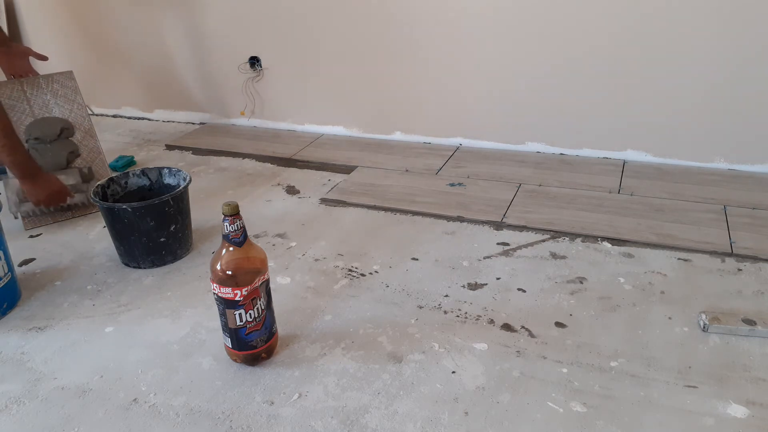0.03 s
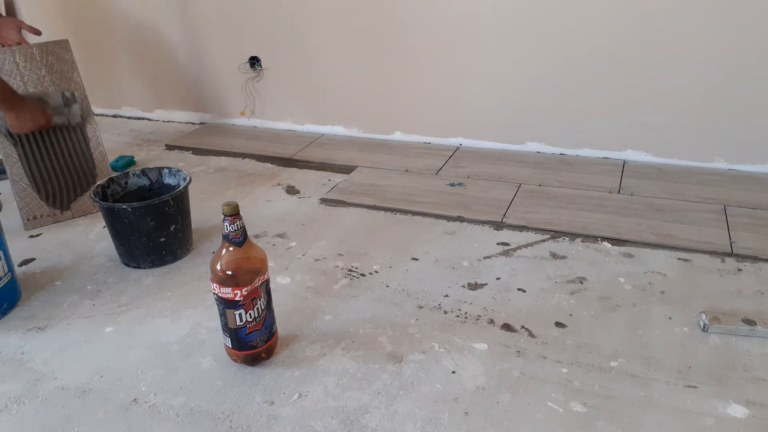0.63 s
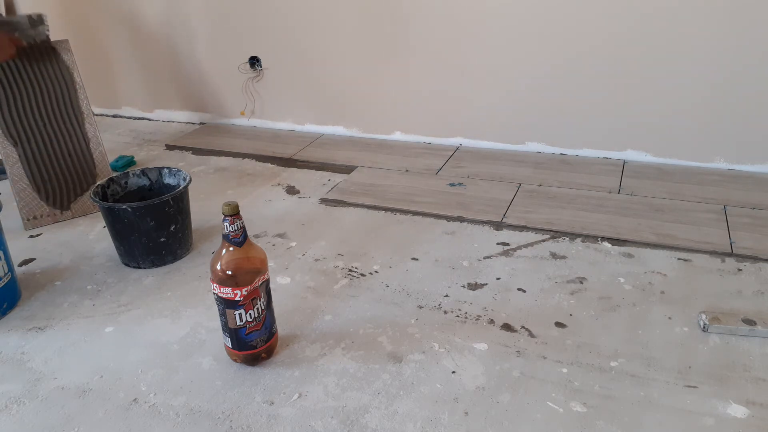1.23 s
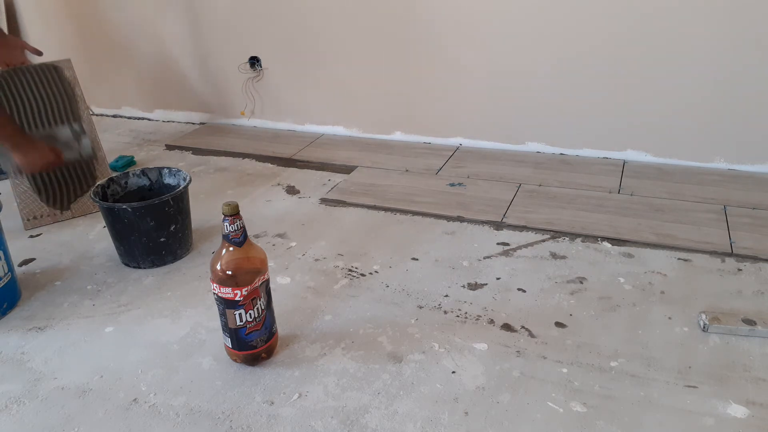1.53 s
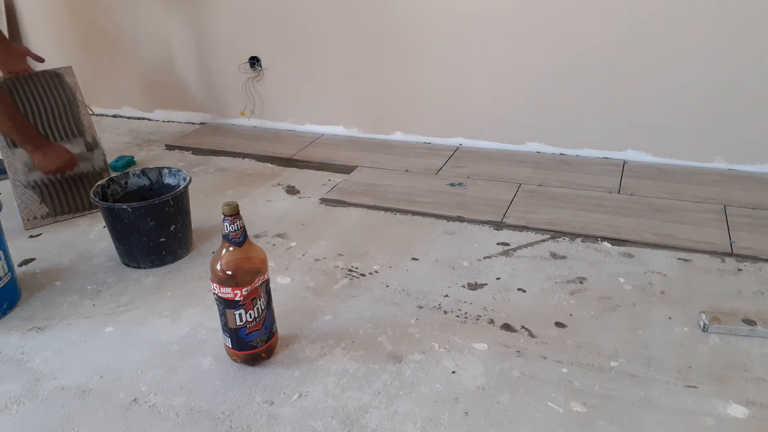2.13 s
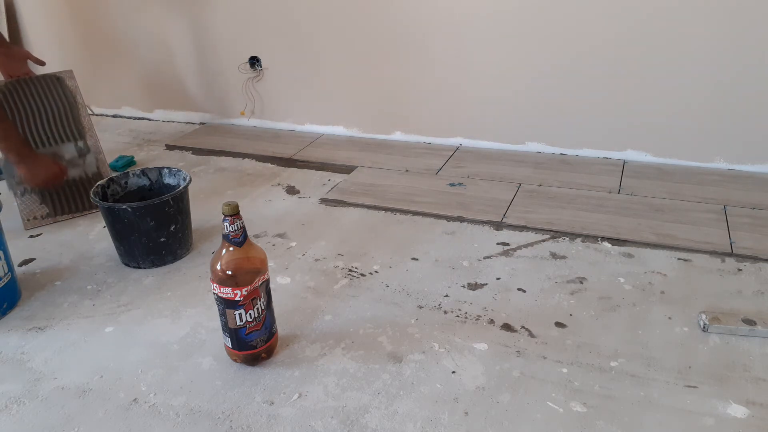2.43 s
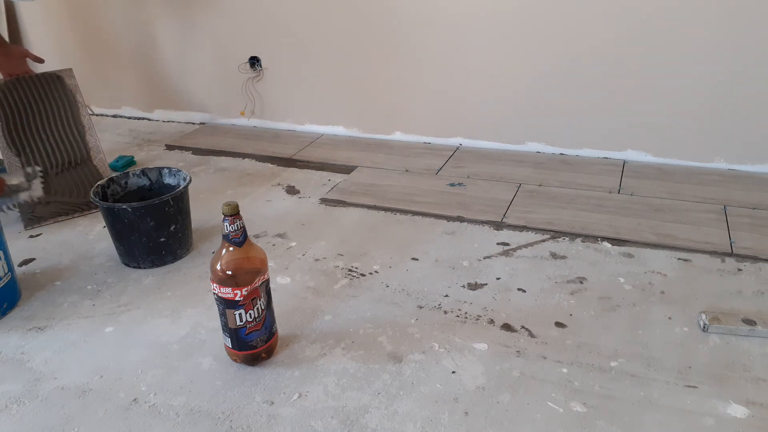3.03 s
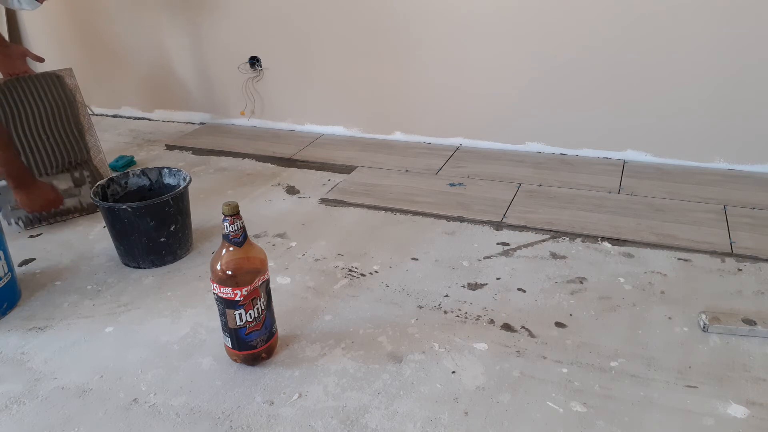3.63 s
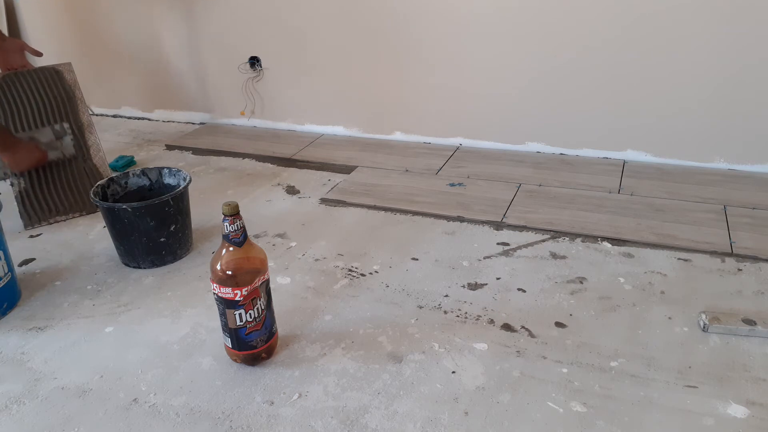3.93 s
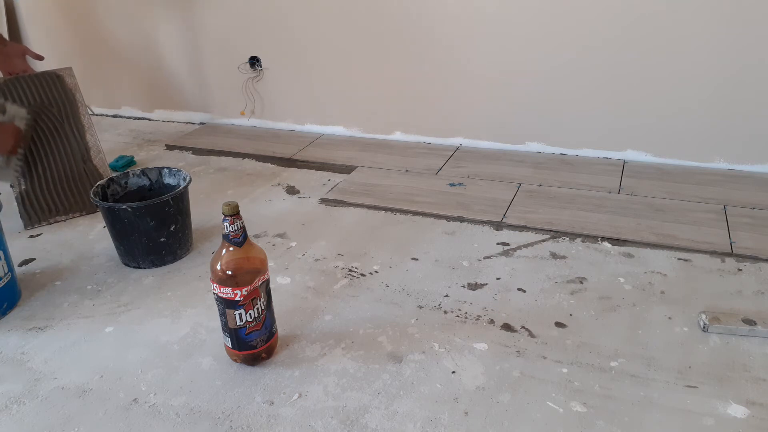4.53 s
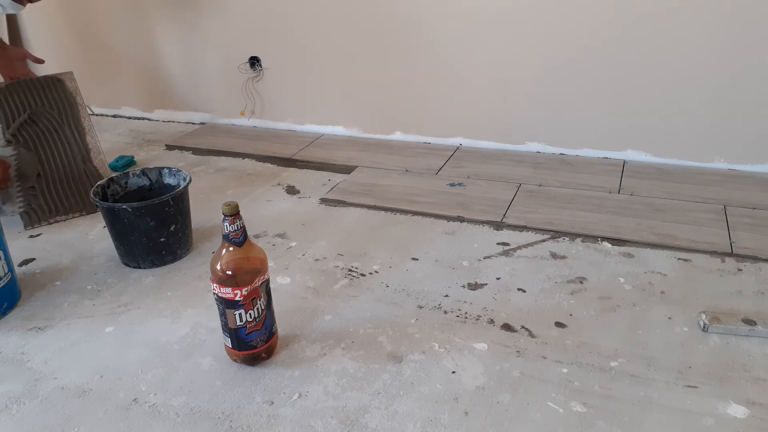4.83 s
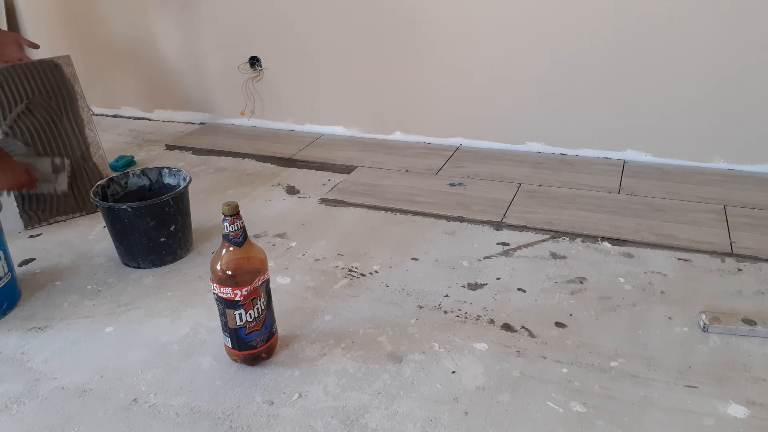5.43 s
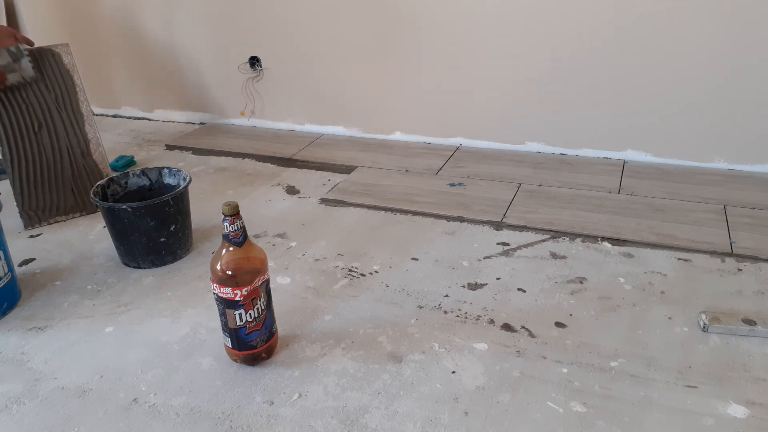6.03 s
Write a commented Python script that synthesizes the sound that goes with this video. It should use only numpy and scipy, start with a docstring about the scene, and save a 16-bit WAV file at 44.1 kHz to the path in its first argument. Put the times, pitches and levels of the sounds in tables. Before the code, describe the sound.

A notched steel trowel scrapes gritty adhesive across a ceramic tile in repeated strokes, with sharp ticks, in an echoing bare room.

```python
"""Over faint room air, a notched steel trowel ticks down on a ceramic tile and combs gritty adhesive.
Short pushes come first: sand snaps under the teeth, the blade judders, the upended tile flexes and drones.
Longer pulls follow at 2.7 s and, hardest, at 3.8 s; after two more, a sharp tick and two hissy dabs end it.
All along, bare plaster and screed ring, so from a few metres off one hears mostly the echo."""
import sys
import numpy as np
from scipy import signal
from scipy.fft import rfft, irfft, next_fast_len
from scipy.io import wavfile
from scipy.ndimage import uniform_filter1d

SR = 44100
rng = np.random.default_rng(int(sys.argv[2]) if len(sys.argv) > 2 else 0)


def pcm_store(signal):
    """Save signal as 16-bit PCM."""
    levels = np.round(np.clip(np.atleast_2d(signal), -1, 1) * 32767)
    wavfile.write(sys.argv[1], SR, levels.astype(np.int16).T)


N = 276495
TIME = np.arange(N) / SR
FFT_SIZE = next_fast_len(N + 2 * SR)
FREQ = np.maximum(np.arange(FFT_SIZE // 2 + 1) * SR / FFT_SIZE, 1)


def undb(db):
    """Decibels to gain."""
    return 10 ** (np.asarray(db) / 20)


def unit_rms(x):
    """Scale to rms 1."""
    return x / np.sqrt(np.mean(x ** 2))


def curve(points):
    """Draw (Hz, value) breakpoints across the spectrum on a log-frequency axis."""
    hz, value = np.transpose(points)
    return np.interp(np.log(FREQ), np.log(hz), value)


def eq(x, response):
    """Filter by a response given for each frequency."""
    return irfft(rfft(x, FFT_SIZE) * response, FFT_SIZE)[..., :x.shape[-1]]


def resonance(hz, width_hz):
    """Response of a damped resonator, 1 at its centre."""
    return 1 / (1 + 1j * (FREQ / hz - hz / FREQ) * hz / width_hz)


def ring(x, hz, width_hz):
    """Play a sound through a damped resonator."""
    return signal.lfilter(*signal.iirpeak(hz, hz / width_hz, fs=SR), x)


def drift(rate_hz):
    """Smooth random modulation with a spread near 1."""
    steps = rng.standard_normal(4096)
    return np.interp(TIME * rate_hz, np.arange(len(steps)), steps)


# tone of the room's air: f/Hz, relative level/dB
AIR_EQ = [(30, -38), (100, 3), (200, -16), (320, 1.5), (600, -11), (1400, -16), (3000, -18), (6500, -12),
          (8300, -25), (15000, -31)]
def room_air(level_db=-70):
    """A faint, steady bed of house air, partly shared by left and right."""
    noise = rng.standard_normal((2, N)) + rng.standard_normal(N)
    return undb(level_db) * unit_rms(eq(noise, undb(curve(AIR_EQ))))


def grit(grains_per_s, spread_db, catch_db, catch_hz):
    """Sand grains snap one by one, many small and a few large; the blade catches and slips."""
    hits = rng.random(N) < grains_per_s / SR
    size = undb(spread_db * np.minimum(rng.exponential(size=N), 5))
    polarity = rng.choice([-1, 1], N)
    grains = hits * size * polarity * undb(catch_db * drift(catch_hz))
    # the hand keeps the mean force steady
    power = uniform_filter1d(grains ** 2, size=2000)
    return grains / np.sqrt(np.maximum(power, 1e-9))


# trowel strokes: landing t/s, skim/s, press/s, slide/s, landing force/dB, full force/dB,
# easing over the slide/dB, flex of the tile/dB, bite of steel on grit/dB
STROKES = [ (.125, 0.057, 0.06, 0.06, -30.5, -16.5, 1, 4, 3),
           (.645, 0.019, 0.033, 0.056, -31.5, -25, 1, 7.5, 2.5),
           (1.112, 0, 0.0071, 0.0083, -31, -26, 0, 7.5, 2.5),
           (1.858, 0.013, 0.063, 0.15, -42.5, -32.5, -2, 6, 0),
           (2.699, 0.086, .19, 0.15, -31, -23, 4, -1.5, 7.5),
           (3.579, 0.06, 0.024, 0.016, -26, -18, 0.5, 6, 2.5),
           (3.758, 0.0019, 0.11, .27, -18, -17, 5, -1.5, 2),
           (4.911, 0.0093, 0.017, 0.032, -29.5, -25.5, 3, 2.5, 2),
           (5.37, 0.033, .04, 0.2, -27.5, -17.5, 5, 2, 0),
           (5.68, 0.011, 0.016, .3, -26, -24.5, 5, 3.5, 3.5),
           (6.065, 0.006, .02, 0.046, -28, -27, 3, 2.5, 8.5),
           (6.17, 0.012, 0.042, .03, -29.5, -24.5, 2, -1, 9)]
def stroke_envelope(flex_share, bite_share, attack_s=0.0097, release_db_per_s=143.5):
    """Envelope of one band of the scrape: the blade lands, skims, is pressed home, slides and lifts."""
    dry_landing_db, gather_s = 9, 0.095  # less flex until paste gathers under the blade
    cling_db_per_s = 50.5  # paste clings to the lifting blade, so the flex outlasts the scrape
    unbite_db_per_s = 52  # the teeth leave the grit first, so the hiss dies soonest
    envelope = np.zeros(N)
    for lands, skim_s, press_s, slide_s, touch_db, full_db, ease_db, flex_db, bite_db in STROKES:
        age = TIME - lands
        pressed = np.clip((age - skim_s) / press_s, 0, 1)
        slid = np.clip((age - skim_s - press_s) / slide_s, 0, 1)
        gathered = np.clip((age - skim_s) / gather_s, 0, 1)
        lifted_s = np.maximum(age - skim_s - press_s - slide_s, 0)
        force = touch_db + (full_db - touch_db) * pressed - ease_db * slid - release_db_per_s * lifted_s
        flex = flex_db - dry_landing_db * (1 - gathered) + cling_db_per_s * lifted_s
        bite = bite_db - unbite_db_per_s * lifted_s
        attack = np.clip(age / attack_s, 0, 1)
        stroke = attack * undb(force + flex_share * flex + bite_share * bite)
        envelope = np.maximum(envelope, stroke)  # one blade: each stroke takes over from the last
    return envelope


# tone of the scrape: f/Hz, relative level/dB
SCRAPE_EQ = [(40, -47), (75, -22), (140, -19), (250, -5.5), (400, -6.5), (700, -1), (1200, -2.5), (2500, 3),
             (4900, -4), (6800, -1), (7700, -6.5), (9000, -22), (12500, -16), (15500, -15)]
# bending modes of the tile: f/Hz, width/Hz, boost/dB
TILE_MODES = [(158, 31, 3), (277, 18, 2), (331, 22, 9), (405, 4.9, 5), (443, 52, 9.5), (556.5, 17.4, 9.5),
              (822, 27, 2.5), (848, 21, 1.5), (1114, 200, 6), (1317, 6.5, 9.5), (1570, 14, 4),
              (2770, 120, 1.5)]
def scrape():
    """Grains under the teeth ring the tile and the blade."""
    grains = grit(grains_per_s=6000, spread_db=3.5, catch_db=2.5, catch_hz=80)
    modes = 1 + sum((undb(db) - 1) * abs(resonance(hz, width)) ** 2 for hz, width, db in TILE_MODES)
    colour = unit_rms(undb(curve(SCRAPE_EQ)) * modes)
    body = curve([(480, 1), (1500, 0)])  # thick paste drags and bends the tile
    hiss = curve([(3000, 0), (12000, 1)])  # bare steel on sand
    # five crossfaded bands that sum to 1: band shape, share of flex, share of bite
    bands = [(body ** 2, 1, 0),
             (2 * body * (1 - body), .5, 0),
             ((1 - body) ** 2 * (1 - hiss) ** 2, 0, 0),
             (2 * hiss * (1 - hiss), 0, .5),
             (hiss ** 2, 0, 1)]
    return sum(eq(grains, colour * band) * stroke_envelope(flex, bite) for band, flex, bite in bands)


# the blade lands or cracks a coarse grain: t/s, level/dB, f/Hz
BLADE_TICKS = [(0.126, -38, 1182), (0.433, -22.5, 4380), (0.657, -27, 3850), (1.122, -32, 4470),
               (2.703, -31, 6500), (3.586, -28, 5670), (3.778, -17, 6000), (4.518, -40, 2980),
               (4.921, -23, 5550), (5.382, -26, 1880), (5.391, -26, 4150), (5.975, -16, 6260)]
def blade_ticks(decay_s=0.0054, width_hz=500, crack_gain=0.068):
    """A brief crack and a ping of the blade, choked by the paste."""
    out = np.zeros(N + SR)
    t = np.arange(SR // 10) / SR
    for at_s, db, hz in BLADE_TICKS:
        noise = rng.standard_normal(len(t))
        ping = unit_rms(ring(noise, hz, width_hz))
        crack = crack_gain * unit_rms(ring(noise, hz, width_hz=hz))
        start = int(at_s * SR)
        out[start:start + len(t)] += undb(db) * (ping + crack) * np.exp(-t / decay_s)
    return out[:N]


# swells of filtered noise, narrow or broad: peak t/s, length/s, f/Hz, width/Hz, level/dB
SWELLS = [(0.345, 0.064, 286, 50, -30), (0.52, 0.081, 273, 80, -36.5), (.726, 0.028, 1580, 160, -31.5),
          (0.777, 0.058, 232, 50, -34.5), (0.792, .12, 343, 120, -39), (0.88, .12, 74.5, 40, -54.5),
          (1.078, 0.14, 230, 70, -50.5), (2.135, 0.068, 480, 340, -38), (2.815, 0.074, 280, 200, -38.5),
          (3.039, 0.083, 2220, 2070, -23.5), (3.08, 0.036, 290, 300, -34.5), (3.84, 0.087, 425, 260, -25.5),
          (3.955, 0.34, 1206, 400, -28), (4.208, 0.2, 418, 28.2, -34), (5.451, 0.038, 1690, 395, -21),
          (5.766, 0.15, 280, 150, -37.5)]
def drones_and_rasps(throb_hz=28, throb_depth=0.31):
    """Short throbbing swells of filtered noise: narrow tile drones and broad rasps."""
    out = np.zeros(N)
    throb = 1 + throb_depth * np.cos(2 * np.pi * throb_hz * TIME + drift(8))
    for peak_s, length_s, hz, width_hz, db in SWELLS:
        swell = np.exp(-2 * ((TIME - peak_s) / length_s) ** 2)
        noise = rng.standard_normal(N)
        band = ring(ring(noise, hz, width_hz), hz, width_hz)
        out += undb(db) * swell * unit_rms(band)
    return out * throb


# decay time of the echo as heard, shorter near 1.5 kHz and in the treble: f/Hz, t60/s
ECHO_DECAY = [(70, 1.3), (200, 1.09), (420, 1.18), (750, 1.08), (1250, 1.07), (1550, 0.81), (2500, 0.99),
              (4500, 0.88), (7500, 0.72), (13000, 0.49)]
def echo_tail(narrow_below_hz=600, build_s=0.0025):
    """Dense echo as heard from one spot: near mono in the bass, wide above."""
    t = np.arange(2 ** 16) / SR
    hz = np.maximum(np.arange(len(t) // 2 + 1) * SR / len(t), 1)
    mid, side = rfft(rng.standard_normal((2, len(t))))
    coherence = .86 / (1 + (hz / narrow_below_hz) ** 4)
    spread = np.array([[1], [-1]]) * side * np.sqrt(1 - coherence)
    field = (mid * np.sqrt(1 + coherence) + spread) / np.sqrt(2)
    centres, t60s = np.transpose(ECHO_DECAY)
    tail = 0
    for t60, share in zip(t60s, np.eye(len(ECHO_DECAY))):
        band = irfft(field * np.interp(np.log(hz), np.log(centres), share))
        envelope = np.exp(-np.log(1000) * t / t60) * (1 - np.exp(-t / build_s))
        tail = tail + band * envelope / np.linalg.norm(envelope)
    return tail


def bare_room(blade, swells, direct_db=-9.0, wet_db=-1.5, right_lag_s=0.000243, spots=4):
    """Direct sound arrives left first; each spot on the blade has its own echo, the swells use one."""
    delays_s = np.array([[0], [right_lag_s]])
    direct = eq(blade + swells, np.exp(-2j * np.pi * FREQ * delays_s))
    reverbs = [rfft(echo_tail(), FFT_SIZE) for _ in range(spots)]
    # long waves cannot tell the spots apart, so the bass shares the swells' reverb
    bass = eq(blade, 1 / (1 + (FREQ / 600) ** 4))
    wet = eq(swells + bass, reverbs[0])
    contact = TIME * 110 + .5 * drift(40)  # hops along the teeth, 110 spots a second
    for spot, reverb in enumerate(reverbs):
        distance = abs((contact - spot) % spots - spots / 2)
        send = np.cos(np.pi / 2 * np.minimum(distance, 1))
        wet += eq((blade - bass) * send, reverb)
    return undb(direct_db) * direct + undb(wet_db) * wet


def scene():
    """Trowel and tile in the bare room, over a bed of air."""
    return bare_room(blade=scrape() + blade_ticks(), swells=drones_and_rasps()) + room_air()


# balance of the two microphone ports: f/Hz, left minus right/dB
PORT_BALANCE = [(80, -3.5), (350, -3.5), (700, -1.5), (1400, -2), (2800, -1.5), (6500, -5), (9500, 2.5),
                (14000, 2)]
def record(dry, top_hz=15900):
    """Each microphone port has its own colour; the phone cuts the top."""
    port_gains = undb(np.array([[.5], [-.5]]) * curve(PORT_BALANCE))
    high_cut = signal.ellip(10, .2, 80, top_hz, fs=SR, output="sos")
    return signal.sosfilt(high_cut, eq(dry, port_gains))


dry = scene()
out = record(dry)
pcm_store(out)
```